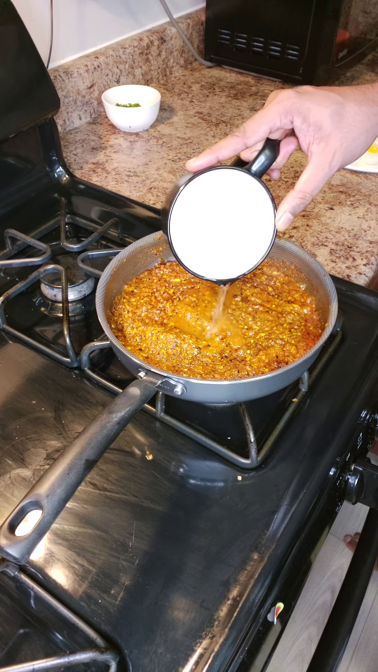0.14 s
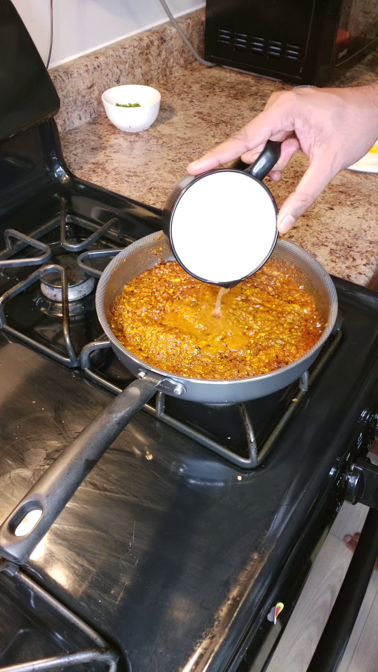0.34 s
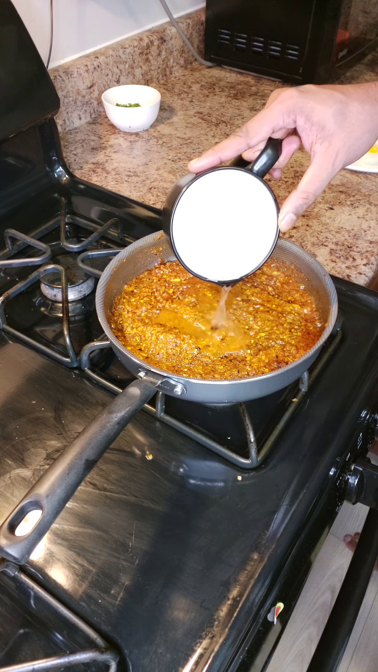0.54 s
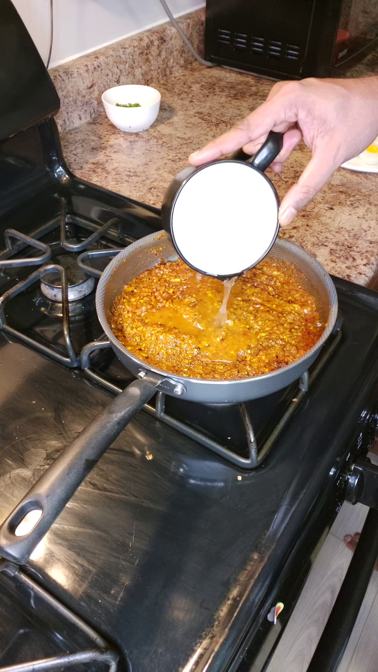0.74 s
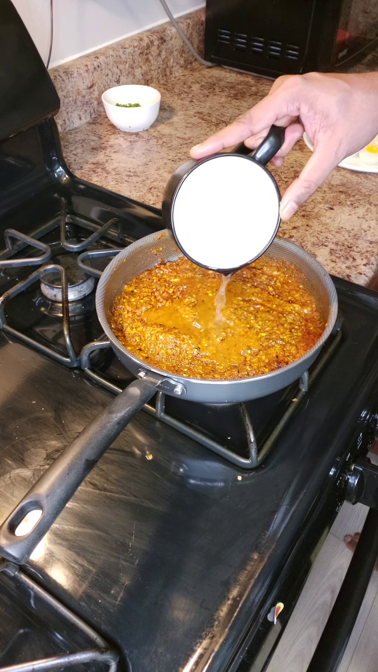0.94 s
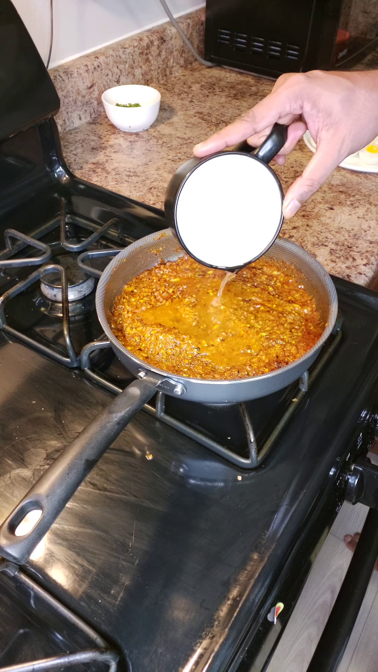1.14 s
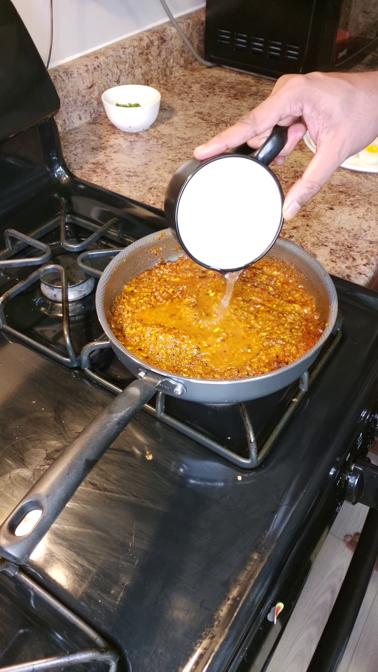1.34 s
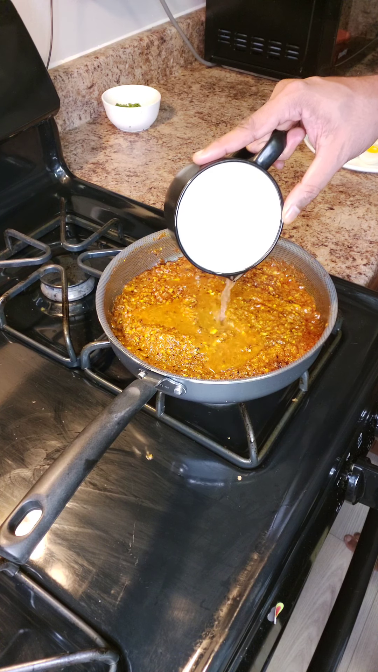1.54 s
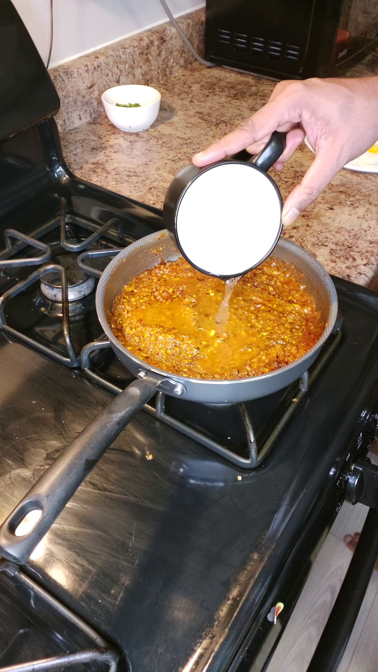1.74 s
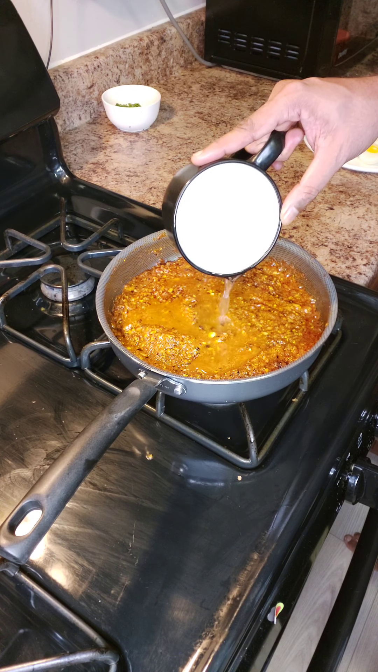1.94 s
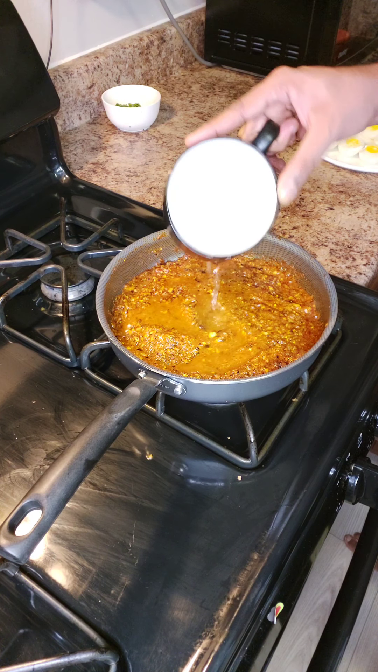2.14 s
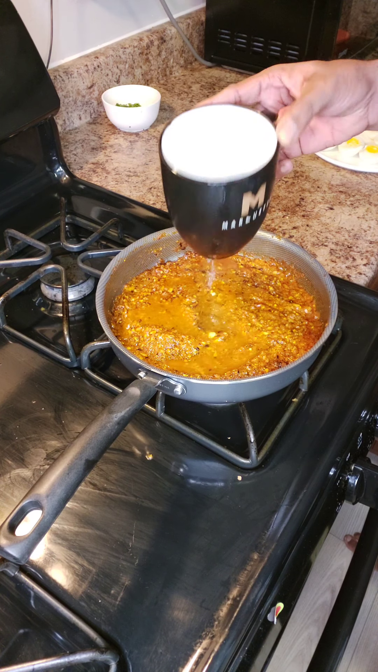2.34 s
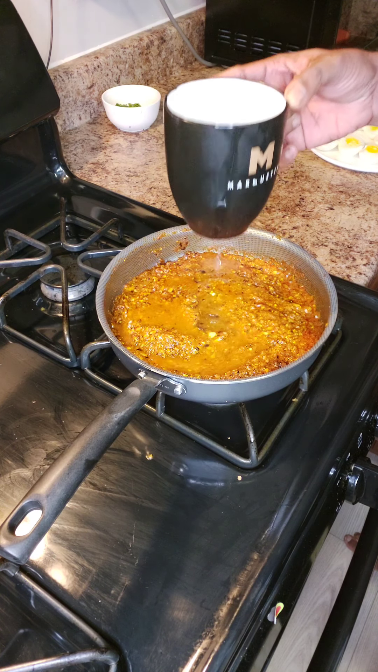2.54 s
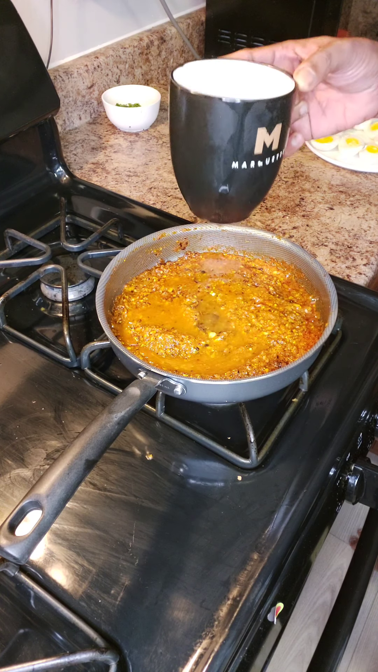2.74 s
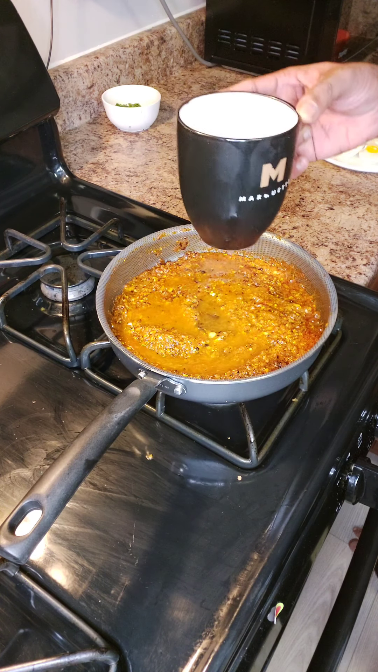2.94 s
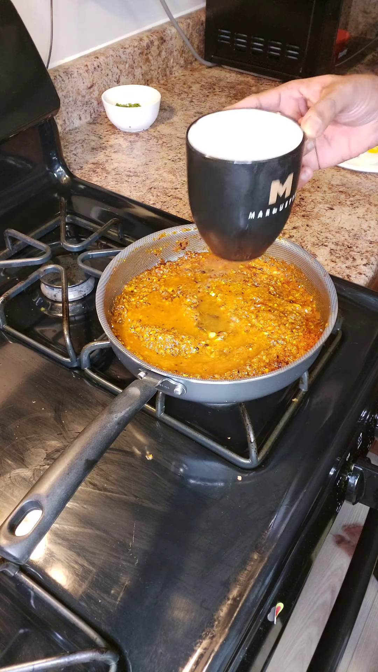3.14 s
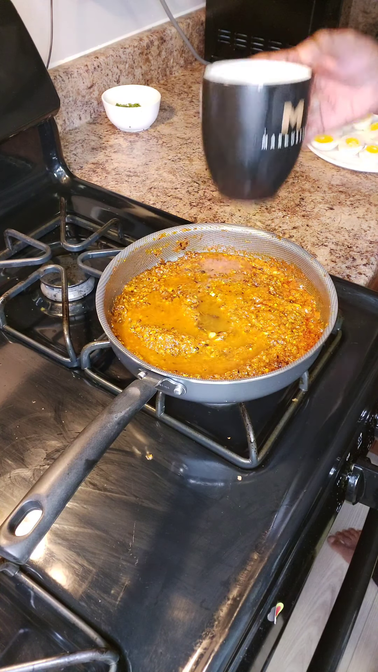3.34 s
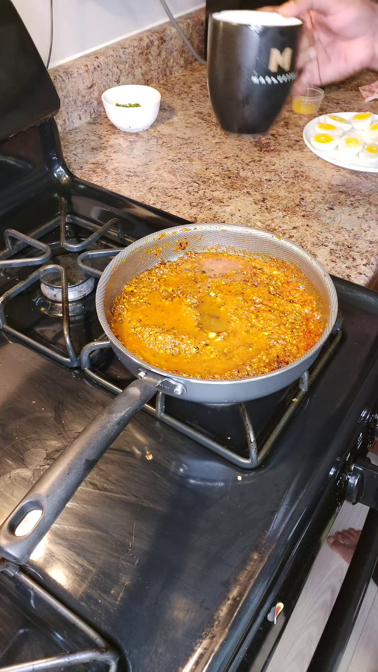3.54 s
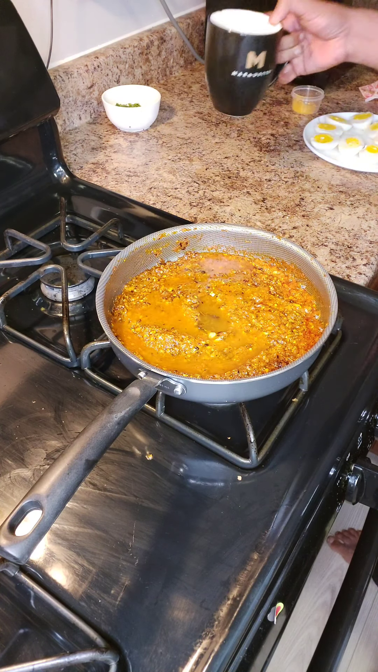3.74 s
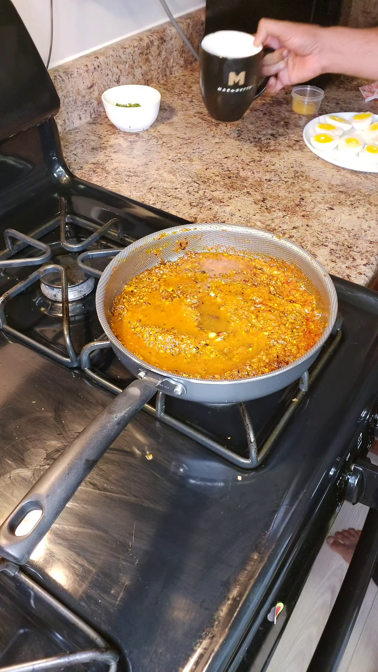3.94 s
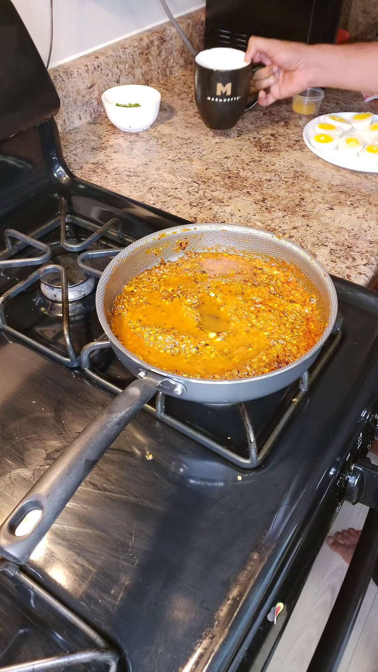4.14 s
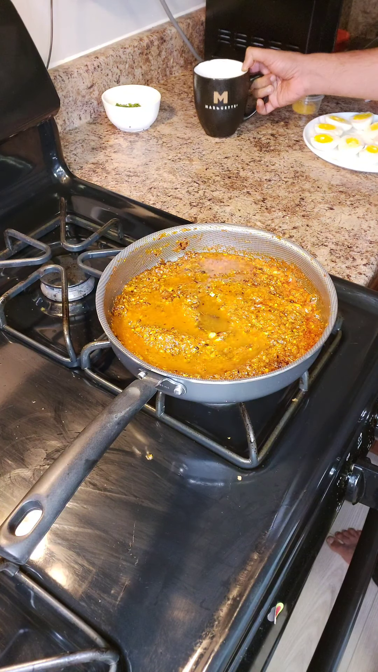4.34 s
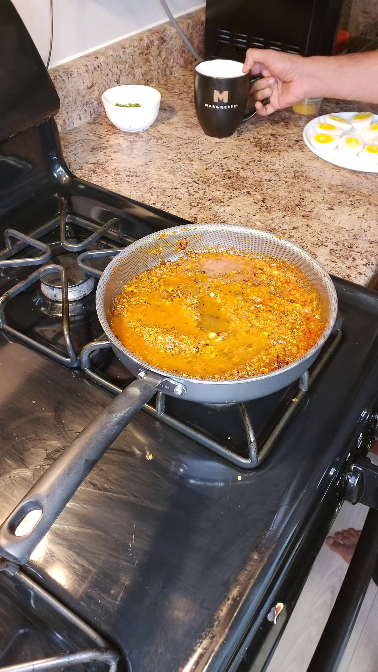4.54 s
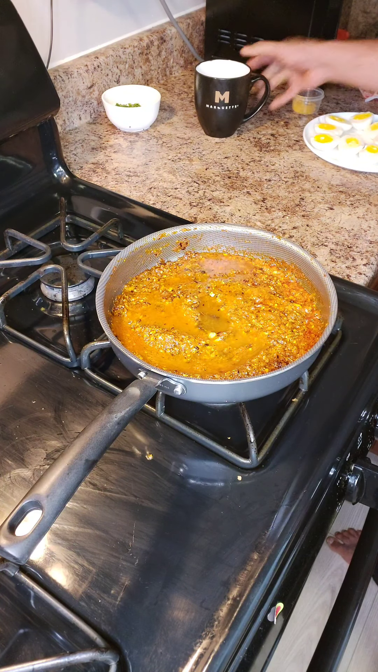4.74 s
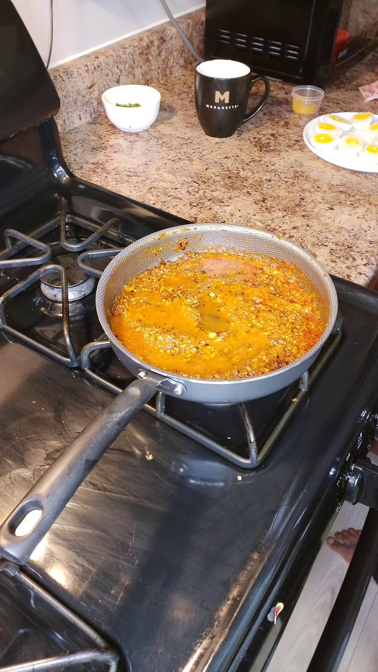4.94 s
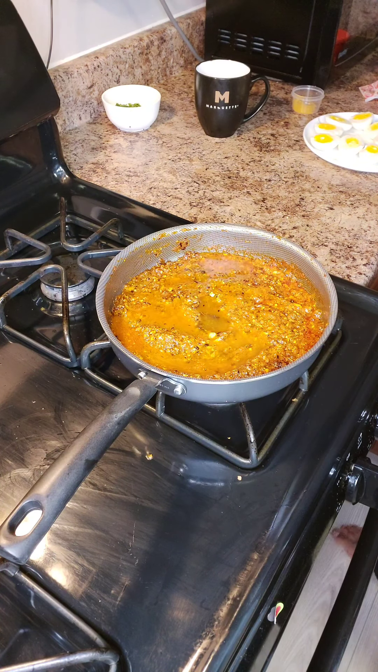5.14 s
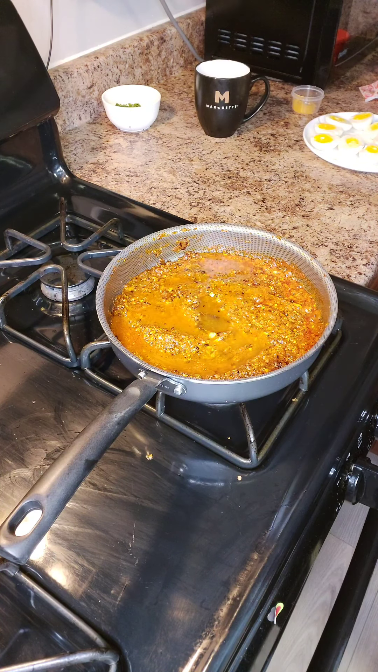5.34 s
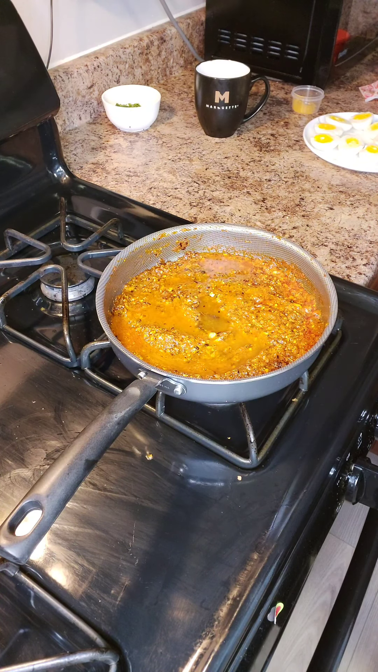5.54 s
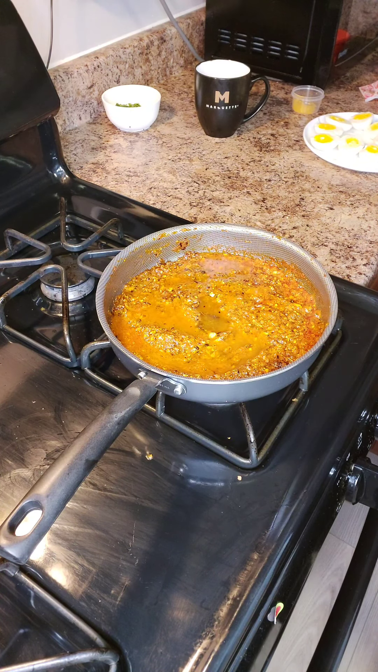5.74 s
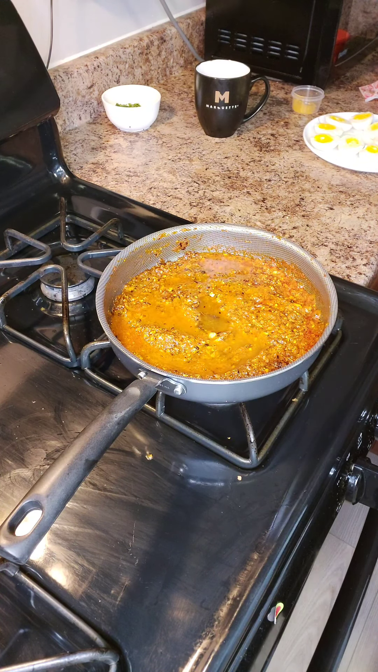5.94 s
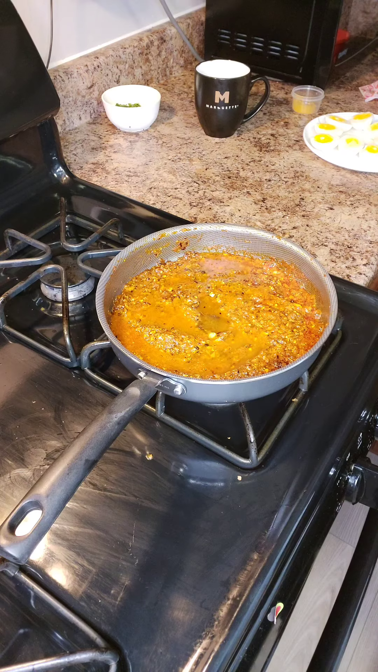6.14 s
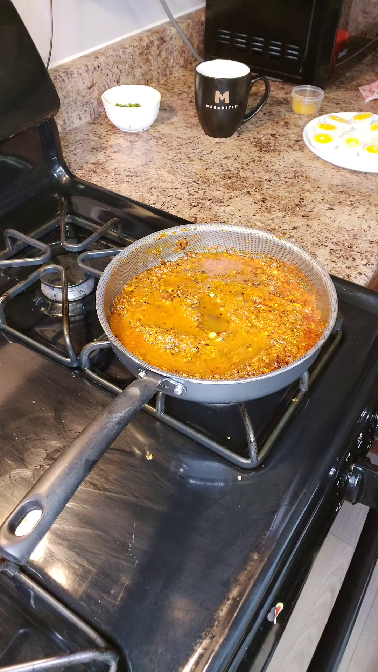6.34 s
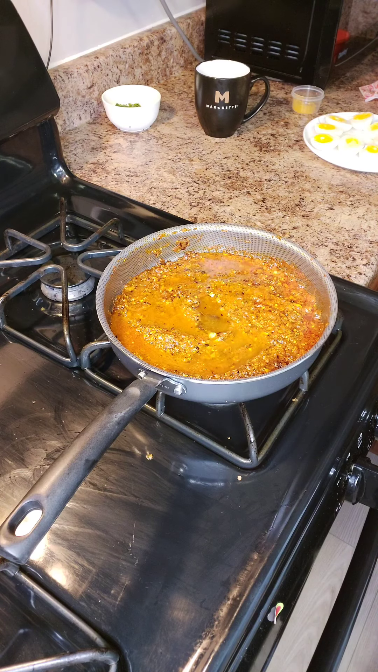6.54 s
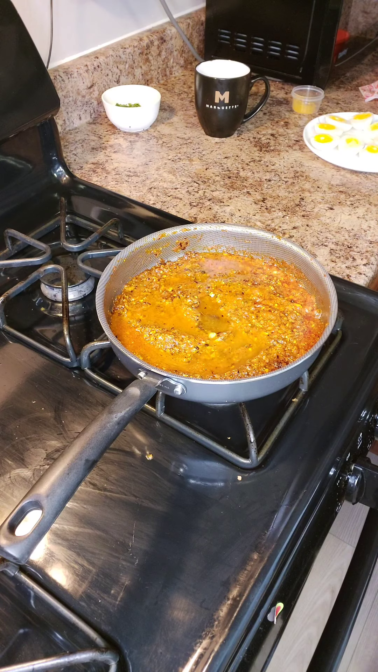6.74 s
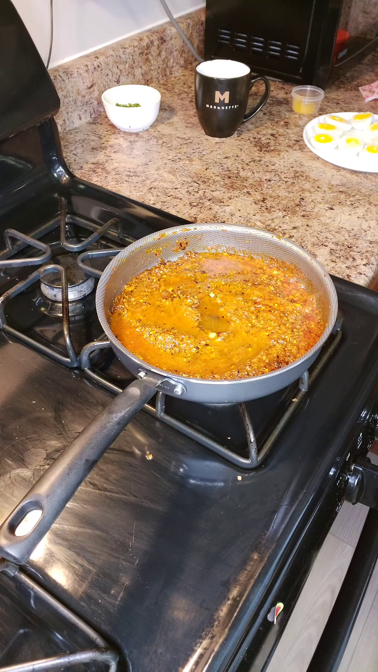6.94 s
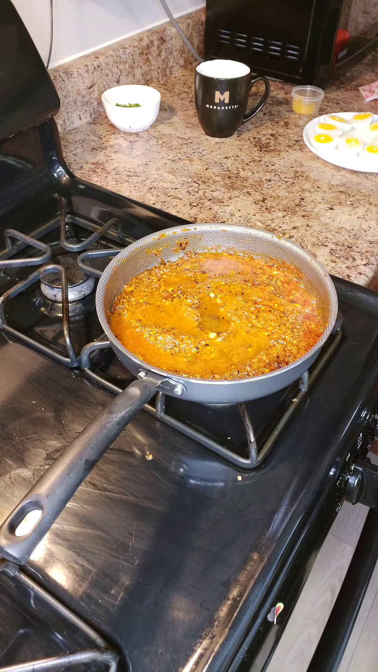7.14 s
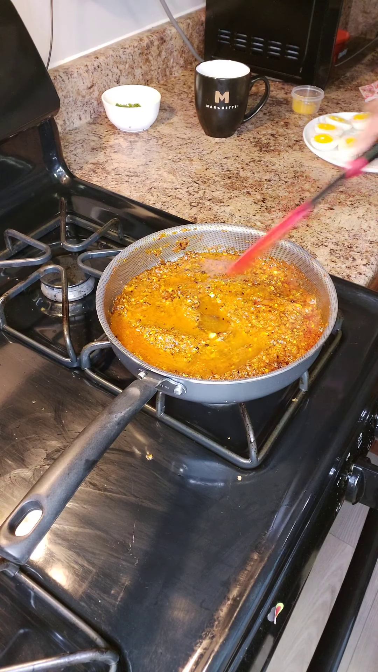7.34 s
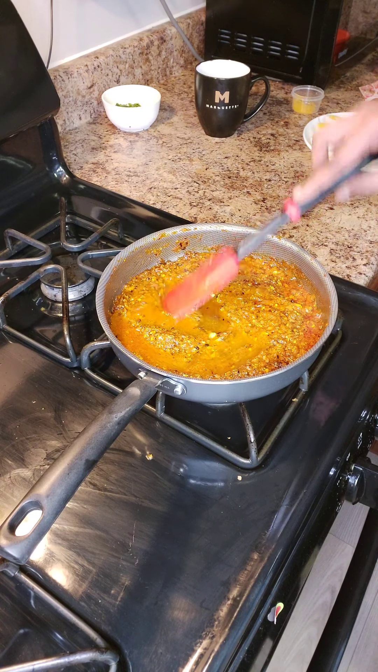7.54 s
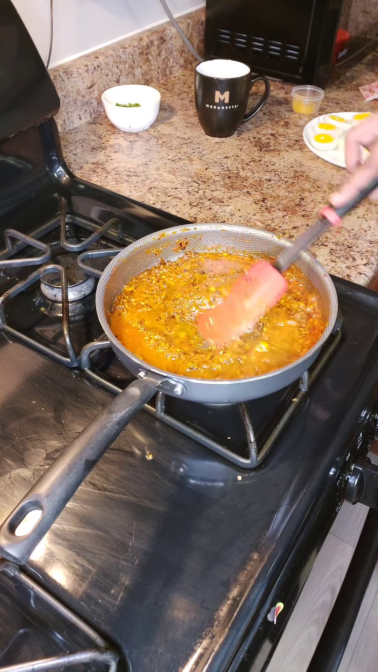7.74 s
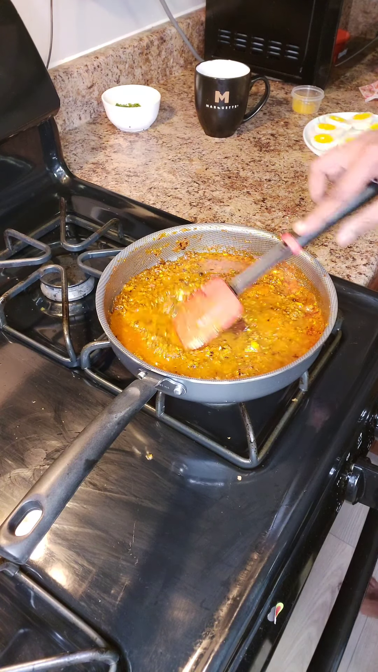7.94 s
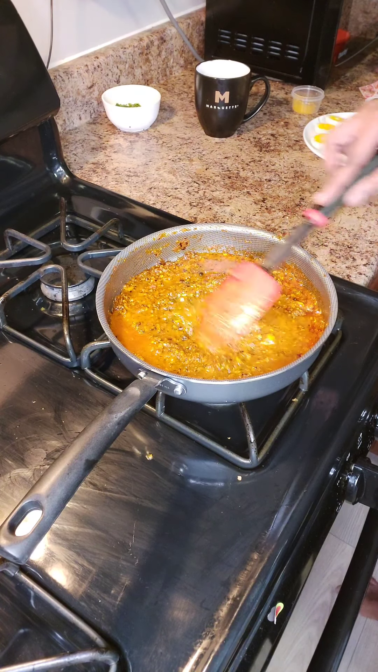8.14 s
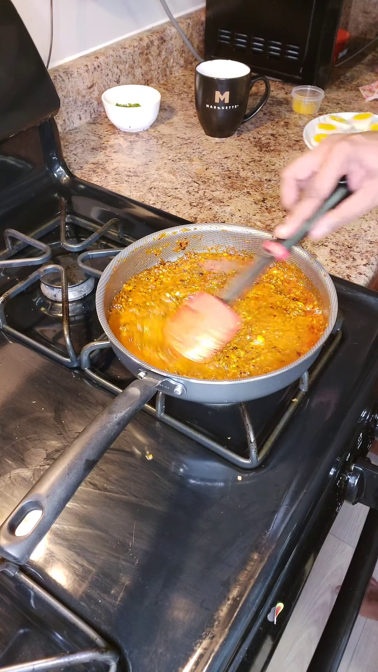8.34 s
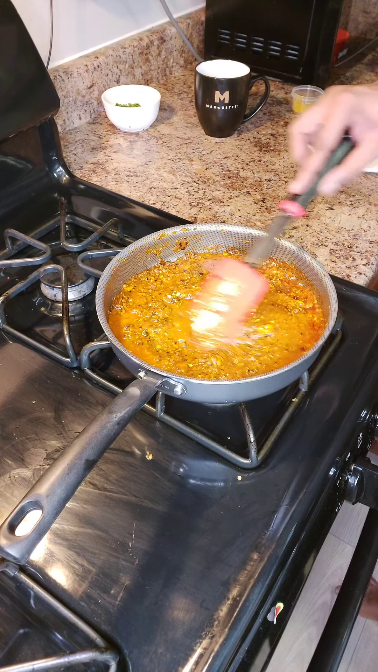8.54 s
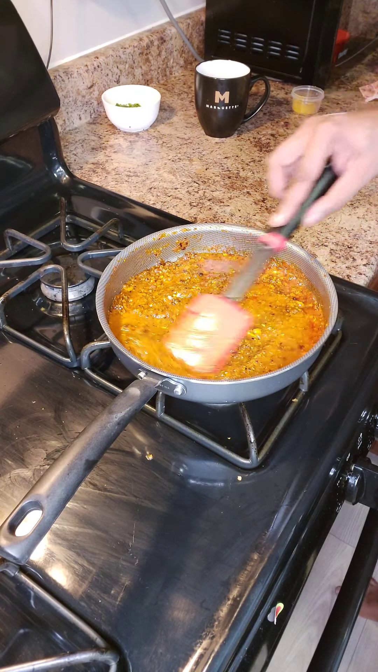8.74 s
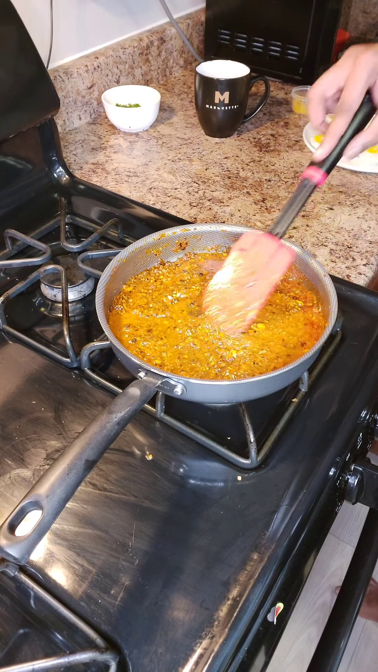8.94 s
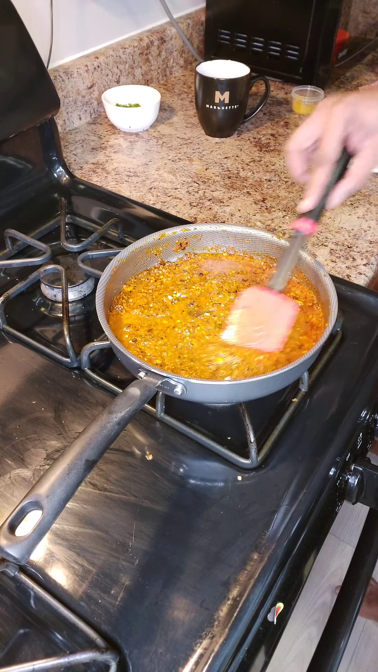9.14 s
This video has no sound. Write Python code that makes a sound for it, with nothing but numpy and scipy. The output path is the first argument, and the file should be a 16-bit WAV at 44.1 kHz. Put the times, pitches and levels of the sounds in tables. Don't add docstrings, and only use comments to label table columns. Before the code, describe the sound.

Close in a hard-walled kitchen, a thin stream of water trickles and plips into a pan of gravy for about two seconds. After a quiet gap a mug clunks sharply on a stone counter and rocks once. A drawer bangs with rattling metal utensils, then thumps shut. Finally a spatula swishes and plops softly in the gravy over a faint fridge hum.

```python
import sys
import numpy as np
from scipy import signal
from scipy.fft import rfft, irfft, next_fast_len
from scipy.io import wavfile
from scipy.ndimage import uniform_filter1d

SR = 44100
rng = np.random.default_rng(int(sys.argv[2]) if len(sys.argv) > 2 else 0)


def volts_from_decibels(level):
    exponent = np.asarray(level, float) / 20
    return 10 ** exponent


def pcm_store(signal):
    levels = np.round(np.clip(np.atleast_2d(signal), -1, 1) * 32767)
    wavfile.write(sys.argv[1], SR, levels.astype(np.int16).T)


N = 409688

# frequency in Hz, level in dB per Hz.
KITCHEN_COLOUR = [(15, -47.5), (25, -52.5), (37, -5.5), (59, -3.5), (120, -7.5), (242, -15.5), (301, -27.5),
                  (439, -23), (659, -16.5), (962, -21.5), (1040, -22), (2050, -31.5), (2990, -30),
                  (9570, -29), (16000, -29.5)]
# frequency in Hz, width in Hz, level in dB.
FRIDGE_CASE = [(111, 16, -75), (159, 12, -82.5), (310.6, 86, -77), (641.5, 99, -76.5), (2120, 470, -79)]
# frequency in Hz, t60 in seconds.
ROOM_T60 = [(60, 0.59), (300, 0.55), (1500, 0.76), (5000, 0.85), (14000, 0.64)]
OCTAVES_HZ = 30 * 2.0 ** np.arange(10)

# peak time in seconds, peak level in dB, length in seconds.
JOLTS = [
    (4.43, -53.5, 0.13),
    (5.48, -84, 0.6),
]
# start in seconds, peak level in dB, pitch in Hz.
BUMPS = [(5.395, -43, 360), (5.527, -33.5, 117), (5.699, -47.5, 99), (6.266, -42.5, 79),
         (6.289, -43.5, 112.5), (6.329, -48, 85.2), (6.449, -46, 120), (6.519, -47, 123),
         (7.164, -46.5, 84), (7.209, -46.5, 105), (7.299, -52, 77), (7.479, -52.5, 82.14), (8.03, -47, 112),
         (8.119, -49, 81.7), (9.239, -52, 98.3)]

# start in seconds, peak level in dB, treble over body in dB (hardness).
DRAWER_BLOWS = [
    (5.456, -50, -7),
    (5.4585, -16, 0),
    (5.489, -21.5, -12),
    (5.514, -23.5, 2.5),
    (5.544, -25, -2.5),
    (5.59, -27.5, -1.5),
    (5.629, -34, -2.5),
    (5.69, -36, -17.5),
]
# start in seconds, peak level in dB, treble over body in dB.
SECOND_BLOWS = [
    (5.812, -24, 5.5),
    (5.839, -29.5, 7.5),
    (5.864, -38, -14),
    (5.959, -36.5, -24),
]
# start in seconds, peak level in dB, treble over body in dB.
SHUT_BLOWS = [
    (6.388, -55, -6),
    (6.399, -27.5, -4.5),
    (6.41, -34, 0.5),
    (6.439, -27, -2.5),
    (6.471, -35, -3),
    (6.508, -38, 1),
    (6.545, -39, -1.5),
]
# frequency in Hz, level in dB per Hz.
DRAWER_THUD = [(24, -41), (40, -10), (120, -5.5), (200, -10.5), (417, 1), (1020, -8), (1640, -9),
               (2220, -17), (2640, -21.5), (2920, -21.5), (3740, -22), (6320, -31), (6980, -33),
               (11800, -34), (15500, -45)]
SECOND_THUD = [(35, -33), (60, -13), (200, -7.5), (370, -4.5), (432, -3.5), (839, -10), (1670, -14),
               (2720, -32.5), (4840, -39), (12000, -59), (15600, -78.5), (22000, -120)]
SHUT_THUD = [(24, -47), (40, -8.5), (160, 3), (346, -9.5), (432, -1.5), (740, -17), (860, -28),
             (1000, -24.5), (2710, -31.5), (4910, -30), (15000, -45)]
# frequency in Hz, level in dB, t60 in seconds.
TRAY = [(407.3, -5.5, .25), (433, -12, .2), (565, -13, 0.14), (905, -8.5, .25), (1139, -17, 0.22),
        (1343, -7.5, 0.16), (2012, -10.5, .2)]
UTENSILS = [(1654, -3.5, 0.27), (2570, -8, .4), (3634, -13.5, .3), (3770, -11, 0.24), (4860, -13, .25),
            (4940, -18, .25), (5800, -27, 0.25), (6230, -17, .25), (6340, -26, 0.18), (7770, -24.5, .2),
            (9350, -24.5, .2), (11780, -20, .25)]
FRONT = [(126, -6.5, 0.17), (200, -2.5, 0.12), (427, -8, 0.18), (607, -8, 0.17), (734, -12, 0.14)]
SPOON = [(4850, -13, 0.097), (4300, -21, 0.033)]

# peak time in seconds, peak level in dB, length in seconds, wet hiss over swish in dB.
MOVES = [(2.6, -66, 1, -5), (3.272, -62, 0.12, -18), (4.025, -66, 0.19, -1.5), (5.25, -61.5, 0.26, -0.5),
         (6.077, -62, 0.52, -9), (6.641, -73, 0.72, -2), (7.105, -75, 0.46, 7), (7.486, -61.5, 0.24, 0),
         (7.673, -65, 0.19, 0.5), (8.024, -65.5, 0.38, -6), (8.262, -68, 0.41, -18.5),
         (8.437, -68, 0.21, -13), (8.643, -60.5, 0.33, -7), (8.845, -73, 0.035, 20),
         (9.12, -71.5, 0.076, -1)]
# frequency in Hz, level in dB per Hz.
SWISH = [(180, -28), (300, 4), (385, -6), (818, -6.5), (1190, -13), (1320, -5.5), (2720, -17), (6000, -20),
         (7800, -70.5), (13200, -120)]
# peak time in seconds, peak level in dB, length in seconds, first pitch in Hz, last pitch in Hz.
DRAGS = [(7.97, -70.5, 0.047, 1900, 2270), (8.01, -71, 0.13, 650, 606), (8.11, -71, .06, 900, 1296),
         (8.2, -67.5, .07, 1600, 2090), (8.26, -67, .09, 1293, 863), (8.25, -70.5, .05, 2500, 2450),
         (8.32, -68, .06, 900, 1400), (8.43, -62, 0.13, 2090, 2350), (8.51, -75, 0.059, 1600, 1500),
         (8.66, -65, .12, 1106, 1400), (8.73, -67, .06, 1300, 1600), (8.79, -68, 0.074, 2100, 1980),
         (8.86, -63, .07, 3200, 3200)]
# start in seconds, peak level in dB, pitch in Hz.
STIR_PLOPS = [
    (6.739, -49.5, 693),
    (7.523, -49, 2140),
    (8.242, -51, 2350),
    (8.442, -50, 590),
    (8.689, -50, 1030),
    (8.842, -61, 2460),
    (9.067, -56, 610),
]
# start in seconds, peak level in dB, pitch in Hz.
STIR_TICKS = [(5.9073, -43.5, 10870), (6.7115, -48, 9990), (6.917, -49.5, 9000), (7.354, -52, 9700),
              (7.5082, -48.5, 10500), (7.8963, -50, 10900), (8.1522, -54, 10200), (8.2849, -50.5, 11200),
              (8.4426, -50, 11200), (8.5593, -48, 11100), (8.7249, -47, 11580), (8.8436, -42.5, 9600)]
# start in seconds, peak level in dB, treble over body in dB, t60 in seconds.
SCRAPES = [
    (2.227, -32.5, -10, 0.07),
    (3.254, -38, -33, 0.13),
    (6.075, -44, 0.5, 0.41),
    (7.523, -50, 4, 0.086),
    (7.971, -46, -10, 0.22),
    (8.197, -60, 14.5, 0.099),
    (8.444, -40, -5.5, 0.18),
    (8.689, -47, -14, 0.2),
    (8.729, -37.5, -14, 0.15),
    (8.843, -70, 28, 0.26),
]
# frequency in Hz, level in dB per Hz.
SCRAPE = [(240, -13), (400, -22), (816, -4.5), (994, -14), (2220, -13.5), (7240, -24.5), (11200, -19),
          (15000, -43)]

# start in seconds, peak level in dB, treble over body in dB.
MUG_BLOWS = [
    (4.389, -73, 2.5),
    (4.4025, -8.5, -4.5),
    (4.417, -12.5, -0.5),
    (4.431, -13.5, -15.5),
    (4.443, -15, -6.5),
    (4.453, -16, -11.5),
]
# start in seconds, peak level in dB, treble over body in dB.
SETTLE_BLOWS = [
    (4.6435, -12, -4.5),
    (4.659, -19.5, -1.5),
    (4.679, -27, -1),
    (4.81, -40.5, -14),
]
# frequency in Hz, level in dB per Hz.
MUG_THUD = [(24, -66.5), (50, -25), (100, -7.5), (145, -16), (200, -7.5), (306, -9), (355, -15), (392, -7),
            (514, -14.5), (800, -15), (1500, -27), (15000, -64)]
# frequency in Hz, level in dB, t60 in
# seconds.
MUG_ON_COUNTER = [(111.4, -12, .2), (155, -18, 0.12), (183.5, -5.5, .15), (247.6, -3, 0.12), (305, 0.5, 0.099),
                  (393, -8, 0.3), (445, -14, 0.14), (563.4, -7.5, .3), (610, -16, .3), (700, -16.5, 0.3),
                  (741, -22, .3), (825, -15, 0.3), (910, -17.5, 0.15), (1010, -22, 0.3),
                  (1210, -24, .2), (1320, -24, .2), (1457, -21.5, .2), (1600, -31, .15), (1755, -29, .2),
       (1970, -31, .15)]

# time in seconds, flow in dB.
POUR = [
    (0.0, -60.5),
    (0.15, -59.5),
    (0.33, -63),
    (0.81, -61),
    (1.12, -56.5),
    (1.25, -63.5),
    (1.58, -59.5),
    (2.05, -59),
    (2.45, -74.5),
]
# peak time in seconds, peak level in dB, length in seconds.
SPURTS = [
    (0.05, -57, 0.14),
    (0.33, -61, 0.34),
    (0.8, -71.5, 0.245),
    (1.0, -47.5, 0.051),
    (1.12, -56, 0.067),
    (1.52, -45.5, 0.041),
    (2.22, -66, 0.081),
]
# start in seconds, peak level in dB, pitch in Hz.
BUBBLES = [(0.075, -38, 1380), (0.436, -35.5, 1410), (0.521, -38.5, 1370), (0.927, -44, 1090),
           (0.965, -40, 1010), (1.008, -39.5, 1040), (1.072, -47, 1330), (1.119, -35, 1170),
           (1.161, -37.5, 1140), (1.176, -38.5, 1110), (1.235, -51, 1810), (1.329, -43, 1670),
           (1.344, -36, 1310), (1.372, -34, 916), (1.5, -42, 1300), (1.52, -45, 1850), (1.535, -51, 1990),
           (1.587, -46, 1160), (1.588, -46, 1900), (1.61, -50, 1100), (1.657, -43.5, 1050),
           (1.702, -47.5, 1340), (1.742, -42, 950), (1.826, -45, 990), (1.96, -45, 950), (1.995, -41, 940),
           (2.067, -45, 800), (2.149, -50, 1370), (2.227, -49, 1570)]
# start in seconds, peak level in dB, pitch in Hz.
CHIRPS = [(0.0643, -40, 3270), (0.2882, -46, 3440), (0.634, -36, 5740), (0.9632, -37, 5460),
          (1.0051, -35.5, 3250), (1.075, -34, 2990), (1.5035, -36, 5800), (1.5189, -31, 5360),
          (1.5569, -32, 3050), (1.6561, -36, 3150), (1.6565, -33, 3830), (1.7085, -37.5, 5900),
          (2.0313, -57, 3820), (2.2268, -40, 2560)]
# start in seconds, peak level in dB, pitch in Hz.
TICKS = [(0.0303, -36, 11600), (0.0628, -38, 9800), (0.1058, -35.5, 9900), (0.2548, -47.5, 11500),
         (0.2882, -51, 9780), (0.3147, -42, 10200), (0.4363, -39.5, 12470), (0.621, -54, 9560),
         (0.6342, -40.5, 9640), (0.8177, -44, 11900), (0.9654, -40.5, 9300), (0.9842, -47, 11100),
         (1.059, -44, 11800), (1.072, -38, 12260), (1.1047, -45, 9700), (1.1614, -35, 11490),
         (1.286, -42.5, 12960), (1.491, -47, 11600), (1.517, -42, 11700), (1.5756, -38.5, 11800),
         (1.685, -47, 12950), (1.8063, -43, 11800), (2.04, -55, 11800), (2.0672, -44, 11700),
         (2.149, -40, 9900), (2.1874, -35.5, 12300), (2.2264, -31.5, 11970), (0.3586, -49, 11000),
         (0.4179, -50, 12200), (0.7731, -44, 11800), (0.8574, -47, 11100), (1.2351, -60, 11300),
         (1.7035, -49, 8900), (1.9155, -59, 11700), (1.9839, -52, 11400), (2.0852, -46, 12200),
         (2.1111, -46, 11500), (2.1625, -48, 11500), (2.172, -45, 11000), (2.285, -56, 9300),
         (2.5618, -49, 12400), (2.5827, -51, 13500)]
# frequency in Hz, level in dB.
PAN_RING = (2140, -15)
# frequency in Hz, level in dB per Hz.
GURGLE = [(120, -49), (200, -32), (302, 2), (481, -29.5), (634, 2.5), (746, -7.5), (3570, -21.5),
          (4000, -14.5), (5200, -24.5), (8800, -120)]
SPRAY = [(1530, 0.5), (2600, -8), (3820, 1), (4900, -1.5), (5620, 0.5), (6730, -3), (9820, 1), (11800, 6),
         (15800, -5.5)]
NO_BASS = [(700, -70)]


def on_log(table, hz):
    f, v = np.transpose(table)
    return np.interp(np.log(np.maximum(hz, 1)), np.log(f), v)


def unit(x):
    return x / np.sqrt(np.mean(x ** 2) + 1e-30)


def shaped(x, gain):
    n = next_fast_len(x.shape[-1])
    f = np.arange(n // 2 + 1) * SR / n
    return irfft(rfft(x, n) * gain(f), n)[..., :x.shape[-1]]


def octave(f, hz):
    return np.cos(np.pi / 2 * np.clip(np.log2(np.maximum(f, 1) / hz), -1, 1)) ** 2


def pair(size, apart_hz=700):
    mid, side = rng.standard_normal((2, size))
    side = shaped(side, lambda f: f / np.hypot(f, apart_hz))
    return np.array([mid + side, mid - side]) / np.sqrt(2)


def walk(rate):
    k = int(SR / rate)
    steps = np.repeat(rng.standard_normal(N // k + 1), k)
    return unit(uniform_filter1d(uniform_filter1d(steps, k), k)[:N])


def hiss(colour, flicker_db, rate):
    n, out = next_fast_len(N), 0
    f = np.arange(n // 2 + 1) * SR / n
    source = rfft(pair(n)) * volts_from_decibels(on_log(colour, f))
    for hz in OCTAVES_HZ:
        band = irfft(source * octave(f, hz), n)[:, :N]
        out = out + volts_from_decibels(flicker_db * walk(rate)) * band
    return unit(out)


def burst(colour, t, t60, treble_db, rise):
    noise = shaped(pair(len(t), apart_hz=1500), lambda f: volts_from_decibels(on_log(colour, f)))
    bright = shaped(noise, lambda f: f ** 2 / (f ** 2 + 1500 ** 2))
    fade = np.minimum(t / rise, 1) ** 2 * volts_from_decibels(-60 * t / t60)
    return ((noise - bright) * fade + volts_from_decibels(treble_db) * bright * fade ** 0.86) / noise.std()


def flow_gain():
    s, db = np.transpose(POUR)
    gain = volts_from_decibels(np.interp(np.arange(N) / SR, s, db, -150, -150))
    return uniform_filter1d(gain, size=600, mode="nearest")


def swells(rows):
    t = np.arange(N) / SR
    rise_share, edge_db = 0.28, -14
    gains = []
    for s, db, length, *_ in rows:
        away = np.maximum((s - t) / rise_share, (t - s) / (1 - rise_share)) / length
        gains.append(volts_from_decibels(db + edge_db * away))
    return gains


def add(out, s, sound):
    i = int(s * SR)
    out[:, i:i + sound.shape[-1]] += sound[..., :N - i]


def pops(events, cycles, glide):
    out = np.zeros((2, N))
    for s, db, hz in events:
        turns = np.arange(int(5 * cycles * SR / hz)) * hz / SR
        swell = (1 - np.exp(-turns / 0.26)) * np.exp(-turns / cycles)
        add(out, s, volts_from_decibels(db) * swell * np.sin(2 * np.pi * turns * (1 + glide * turns / cycles)))
    return out


def swarm(count, low_hz, high_hz, gain, spread_db):
    when, size, pitch = rng.random((count, 3)).T
    live = np.flatnonzero(gain > 1e-6)
    at = live[(when * len(live)).astype(int)]
    db = 20 * np.log10(gain[at]) + spread_db * size ** 3
    return np.c_[at / SR, db, low_hz * (high_hz / low_hz) ** pitch]


def ticks(events, cycles):
    t = np.arange(SR // 10) / SR
    out = volts_from_decibels(4.5) * pops(events, cycles, glide=0.0037)
    out = out + volts_from_decibels(-0.5) * pops(events, cycles=0.6, glide=0.15)
    for s, db, _ in events:
        add(out, s, volts_from_decibels(db - 18) * burst(NO_BASS + SPRAY, t, t60=0.067, treble_db=6.5, rise=0.00053))
    return out


def blows(events, colour, thud_t60, modes, longest, split, ring_db, upper_db, rise, detune):
    out, t = np.zeros((2, N)), np.arange(SR // 2) / SR
    for s, db, treble_db in events:
        ring = 0
        for hz, mode_db, t60 in modes:
            t60 = min(t60, longest * (split / hz) ** 0.221)
            level_db = mode_db + (upper_db + treble_db) * (hz > split)
            fade = volts_from_decibels(level_db - 60 * t / t60)
            for size, off in rng.standard_normal((3, 2)):
                ring = ring + fade * volts_from_decibels(0.94 * size) * np.sin(2 * np.pi * hz * (1 + detune * off) * t)
        thud = burst(colour, t, thud_t60, treble_db, rise=rise)
        add(out, s, volts_from_decibels(db - 9) * (thud + volts_from_decibels(ring_db) * np.minimum(t / rise, 1) * ring))
    return out


def room(x, wet_db, near_db, near_t60):
    t, tail = np.arange(int(0.7 * SR)) / SR, 0
    noise = pair(len(t), apart_hz=500)
    for hz in OCTAVES_HZ:
        band = shaped(noise, lambda f: octave(f, hz))
        tail = tail + band * volts_from_decibels(-60 * t / on_log(ROOM_T60, hz))
    tail = tail * np.clip((t - 0.003) / 0.0061, 0, 1)
    near = pair(len(t), apart_hz=500) * volts_from_decibels(-60 * t / near_t60) * (t > 0.002)
    both = 0
    for db, part in ((wet_db, tail), (near_db, near)):
        both = both + volts_from_decibels(db) * part / np.sqrt(np.sum(part ** 2) / 2)
    return x + signal.fftconvolve(x.mean(0)[None], both, axes=1)[:, :N]


def toward_left(x, db):
    return x * volts_from_decibels(np.array([[db / 2], [-db / 2]]))


def kitchen():
    motor_hz = 57.2 + 2.145 * walk(9.4)
    motor = volts_from_decibels(-66.5 + 1.5 * walk(15)) * np.sin(2 * np.pi * np.cumsum(motor_hz) / SR)
    fading_db = 0.44 * np.arange(N) / SR
    case = 0
    for hz, width, db in FRIDGE_CASE:
        tone = unit(shaped(pair(N), lambda f: 1 / (1 + ((f - hz) / width * 2) ** 2)))
        case = case + volts_from_decibels(db + 2.7 * walk(11) + 3.4 * walk(3.5) - fading_db * (hz > 1000)) * tone
    return volts_from_decibels(-66.5) * hiss(KITCHEN_COLOUR, 1.46, 14) + motor + case


def simmer():
    since = np.arange(N) / SR - 2.3
    gain = (volts_from_decibels(-69.5 + 0.13 * since) + sum(swells(JOLTS))) * (since > 0)
    bubbles = swarm(count=1500, low_hz=7100, high_hz=15320, gain=gain, spread_db=16)
    return volts_from_decibels(1.5) * pops(bubbles, cycles=4.0, glide=0.012)


def floor_bumps():
    return volts_from_decibels(-2.0) * pops(BUMPS, cycles=1.96, glide=-0.0052)


def drawer_knocks():
    modes = TRAY + UTENSILS
    first = blows(DRAWER_BLOWS, DRAWER_THUD, 0.25, modes, longest=0.39, split=1500,
                  ring_db=-11, upper_db=3.0, rise=0.0025, detune=0.0071)
    second = blows(SECOND_BLOWS, SECOND_THUD, 0.12, modes, longest=0.15, split=4000,
                   ring_db=-18, upper_db=-4.0, rise=0.003, detune=0.0078)
    return first + second


def drawer_shut():
    return blows(SHUT_BLOWS, SHUT_THUD, 0.24, FRONT + SPOON, longest=0.12, split=3000,
                 ring_db=-8, upper_db=5.5, rise=0.005, detune=0.0092)


def moves():
    passes = swells(MOVES)
    swish = sum(passes)
    wet = sum(gain * volts_from_decibels(row[-1]) for gain, row in zip(passes, MOVES))
    pockets = swarm(count=700, low_hz=602, high_hz=3900, gain=swish, spread_db=8)
    sticky = volts_from_decibels(-7.0) * pops(pockets, cycles=5.1, glide=0.04)
    rub = volts_from_decibels(-1.0) * swish * hiss(SWISH, 2.8, 25)
    return sticky, rub + wet * hiss(NO_BASS + SPRAY, 3.2, 21)


def drags():
    out, t, width_hz = 0, np.arange(N) / SR, 260
    flutter = shaped(rng.standard_normal((2, 2, N)), lambda f: 1 / (1 + (2 * f / width_hz) ** 4))
    flutter = unit(flutter[:1] + 0.67 * flutter)
    for gain, (s, _, length, from_hz, to_hz) in zip(swells(DRAGS), DRAGS):
        on = slice(int((s - length) * SR), int((s + 2 * length) * SR))
        hz = np.interp(t[on], [s - length / 2, s + length / 2], [from_hz, to_hz])
        turn = 2 * np.pi * np.cumsum(hz) / SR
        wet = flutter[:, 0, on] * np.sin(turn) + flutter[:, 1, on] * np.cos(turn)
        out = out + np.pad(gain[on] * wet, [(0, 0), (on.start, N - on.stop)])
    return out


def scrapes():
    out, t = np.zeros((2, N)), np.arange(SR // 3) / SR
    for s, db, treble_db, t60 in SCRAPES:
        add(out, s, volts_from_decibels(db - 13.5) * burst(SCRAPE, t, t60, treble_db, rise=0.00074))
    return out


def mug_down():
    modes = MUG_ON_COUNTER
    knock = blows(MUG_BLOWS, MUG_THUD, 0.11, modes, longest=0.097, split=1000,
                  ring_db=-6.5, upper_db=4.5, rise=0.0028, detune=0.0068)
    settle = blows(SETTLE_BLOWS, MUG_THUD, 0.089, modes, longest=0.11, split=1500,
                   ring_db=-7.5, upper_db=1, rise=0.0014, detune=0.0084)
    return knock + settle


def drumming():
    low = shaped(pair(N), lambda f: np.exp(-np.log2(np.maximum(f, 1) / 220) ** 2 / 3.6))
    return volts_from_decibels(-8.5) * volts_from_decibels(2 * walk(20)) * flow_gain() * unit(low)


def pour():
    flow = flow_gain()
    spray = volts_from_decibels(0.5) * flow + sum(swells(SPURTS)) * (flow > 1e-6)
    small = swarm(count=450, low_hz=950, high_hz=3250, gain=flow, spread_db=9)
    fine = swarm(count=900, low_hz=8700, high_hz=15800, gain=spray, spread_db=12)
    ping_hz, ping_db = PAN_RING
    pings = [(s, db + ping_db, ping_hz) for s, db, _ in BUBBLES]
    bubbles = volts_from_decibels(4.5) * pops(BUBBLES, cycles=1.84, glide=0.0088)
    bubbles = bubbles + volts_from_decibels(-2.5) * pops(CHIRPS, cycles=2.6, glide=0.0066)
    bubbles = bubbles + pops(pings, cycles=5.1, glide=0.003)
    bubbles = bubbles + volts_from_decibels(3.5) * pops(small, cycles=2.36, glide=0.017)
    droplets = volts_from_decibels(6.0) * pops(fine, cycles=0.71, glide=0.023) + ticks(TICKS, cycles=7.0)
    wash = volts_from_decibels(0.5) * flow * hiss(GURGLE, 3.9, 26.2) + volts_from_decibels(-3) * spray * hiss(NO_BASS + SPRAY, 3, 30)
    return bubbles, droplets, wash


def scene():
    bubbles, droplets, wash = pour()
    sticky, swish = moves()
    bubbles = bubbles + pops(STIR_PLOPS, cycles=2.1, glide=0.0081) + scrapes() + sticky
    droplets = droplets + ticks(STIR_TICKS, cycles=3.4) + simmer()
    water = room(bubbles, wet_db=-6, near_db=2.8, near_t60=0.09)
    water = water + room(droplets, wet_db=-10, near_db=-6, near_t60=0.1)
    mug = room(mug_down(), wet_db=-2.5, near_db=-3.5, near_t60=0.089)
    drawer = room(drawer_knocks() + floor_bumps(), wet_db=-5, near_db=-2.5, near_t60=0.26)
    drawer = drawer + room(drawer_shut(), wet_db=-11, near_db=-1.5, near_t60=0.23)
    near = toward_left(water, 0.85) + toward_left(mug, 1.3) + toward_left(drawer, 1.8)
    thin = signal.sosfilt(signal.butter(2, 65, "high", fs=SR, output="sos"), near)
    return thin + toward_left(wash + swish + drags() + drumming() + kitchen(), 3.5)


def roll_off(x):
    return signal.sosfilt(signal.butter(12, 16620, fs=SR, output="sos"), x)


def record(dry):
    right_lag, top_hz = 5, 15850
    spaced = np.array([dry[0], np.roll(dry[1], right_lag)])
    mix = shaped(spaced, lambda f: f < top_hz)
    return roll_off(mix)


dry = scene()
out = record(dry)
pcm_store(out)
```